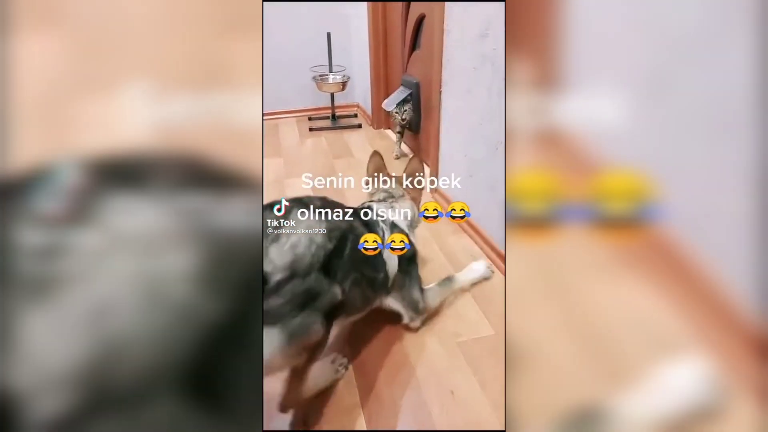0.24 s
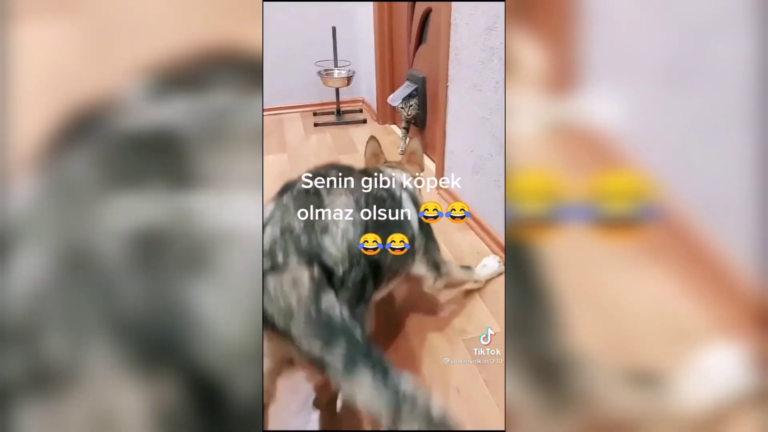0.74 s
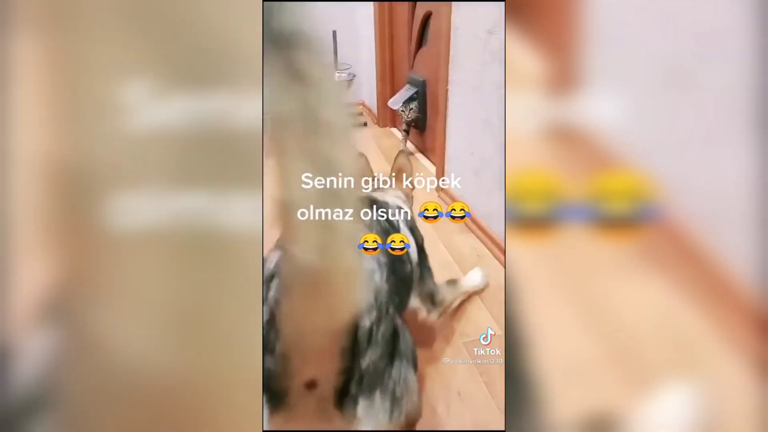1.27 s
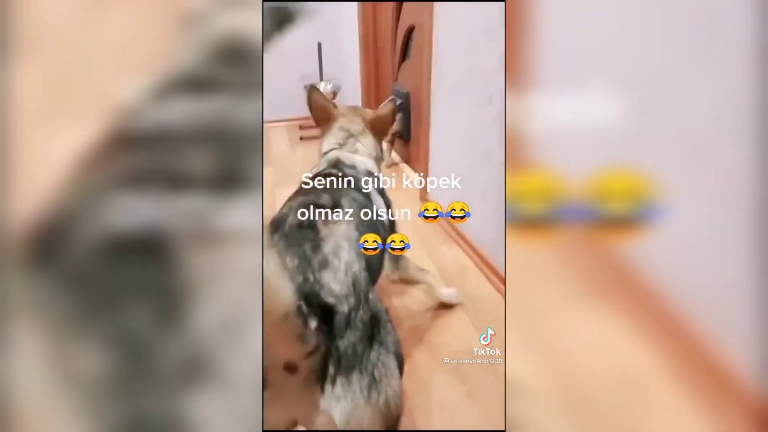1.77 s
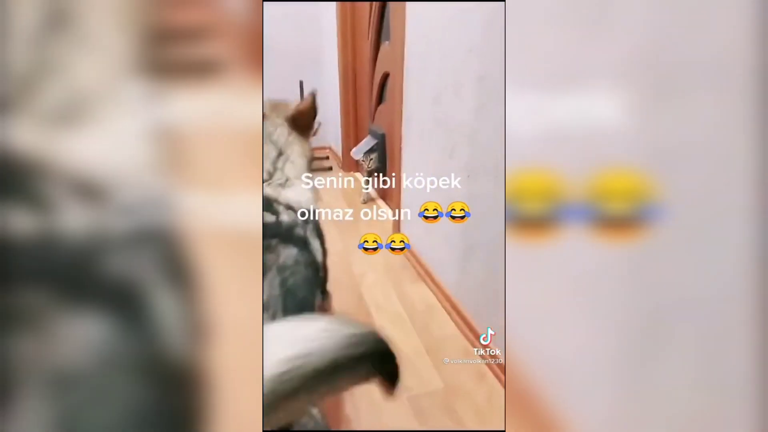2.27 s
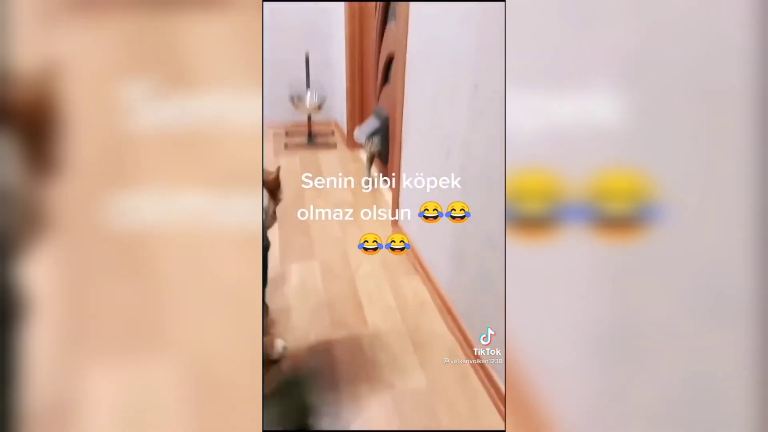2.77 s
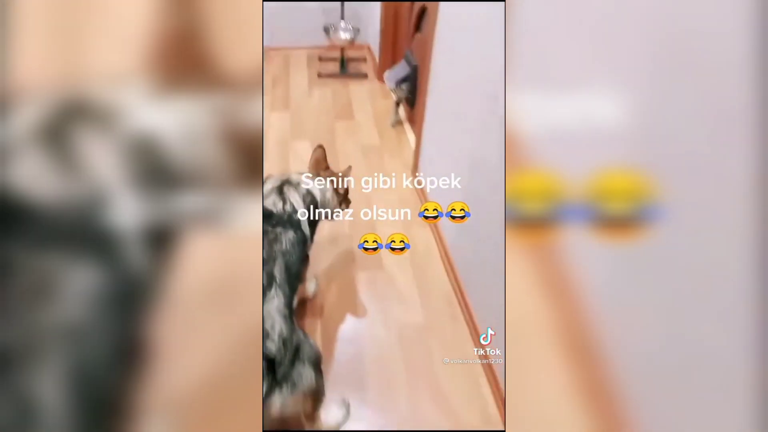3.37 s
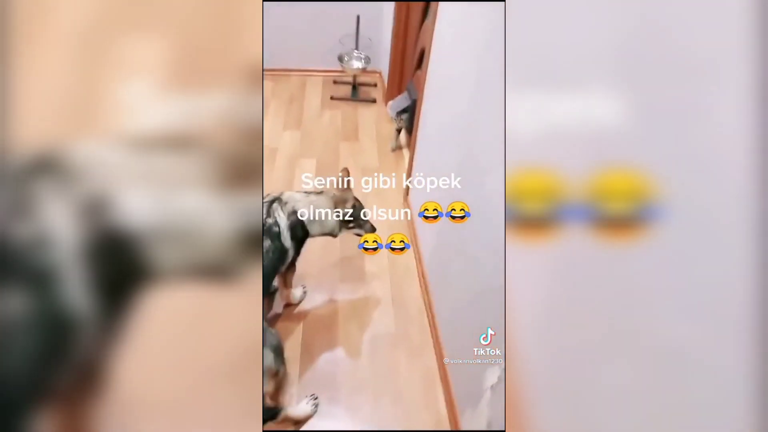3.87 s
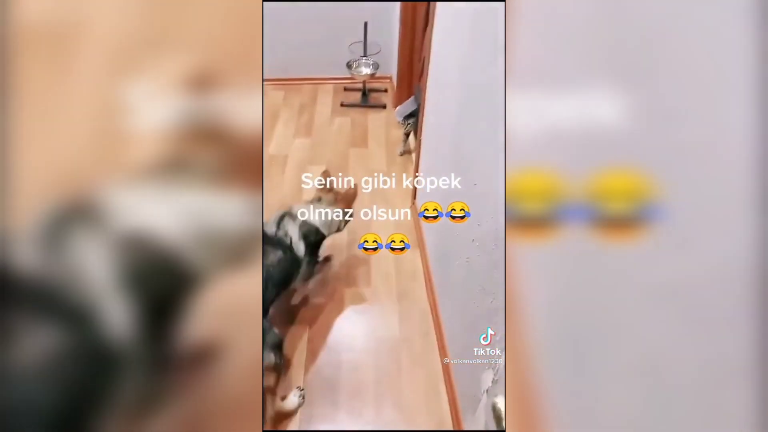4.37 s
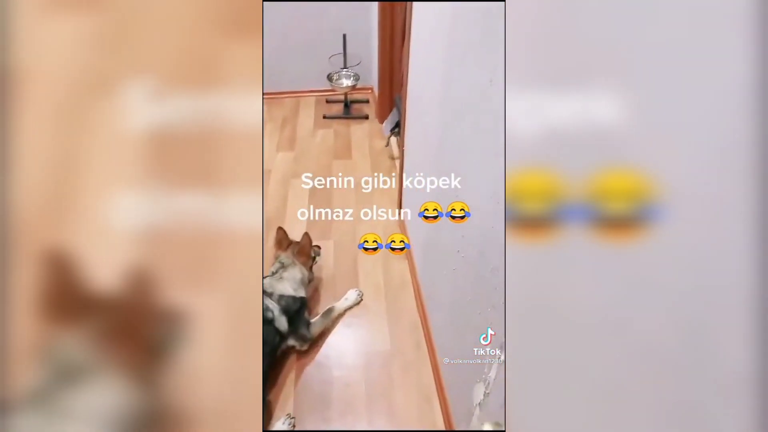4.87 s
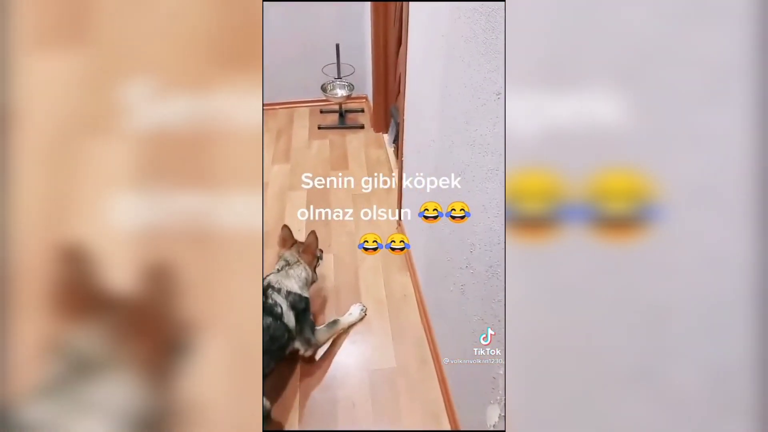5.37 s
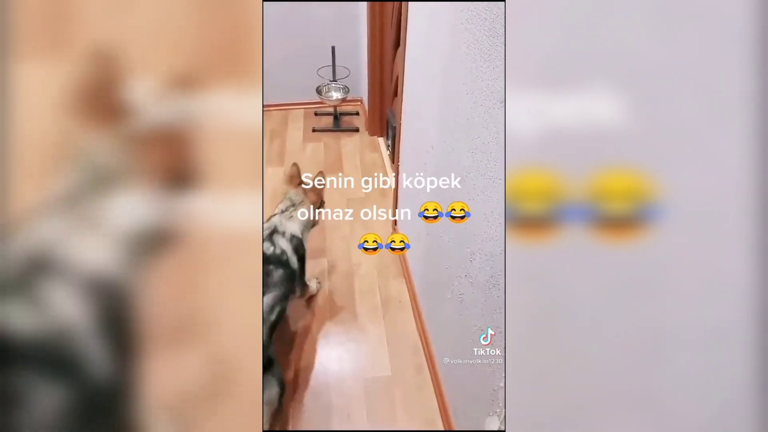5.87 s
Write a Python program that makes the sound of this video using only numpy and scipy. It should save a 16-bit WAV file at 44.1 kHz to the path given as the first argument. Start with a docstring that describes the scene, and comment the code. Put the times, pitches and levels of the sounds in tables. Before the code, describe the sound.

A dog barks, growls up into rasping yelps and a yowl, holds a long thin whine, then barks again and snorts indoors.

```python
"""A dog complains in a small room with a wooden floor and bare walls.
It barks and huffs, moans and growls its way up to rasping yelps and a yowl, holds a long thin whine,
barks again, grumbles, then sniffs and snorts. The calls are vocal fold pulses coloured by the throat,
the whine a note through the nose, the sniffs turbulent air. Throughout, its body bumps and brushes
the floor as it gets up and moves about."""
import sys
import numpy as np
from scipy import signal
from scipy.fft import rfft, irfft, next_fast_len
from scipy.io import wavfile
from scipy.ndimage import uniform_filter1d

SR = 44100
rng = np.random.default_rng(int(sys.argv[2]) if len(sys.argv) > 2 else 0)


def store_wav(level_fs):
    """Save 16-bit WAV to argv[1]."""
    pcm = np.round(np.clip(np.atleast_2d(level_fs), -1, 1) * 32767)
    wavfile.write(sys.argv[1], SR, pcm.T.astype(np.int16))


N = 270774

# room noise spectrum: f/Hz, level/dB
HUSH_SPECTRUM = [(30, -9.5), (130, -8.5), (400, -30), (1500, -26), (3300, -27), (6700, -17.5),
                 (15500, -33.5)]
# room decay: f/Hz, T60/s
ROOM_DECAY = [(90, 0.47), (250, 0.24), (600, 0.3), (2000, 0.33), (6000, 0.25), (14000, 0.23)]
# early echoes: delay/s, relative gain
WALL_ECHOES = [(.0031, -0.64), (.0058, -0.37), (.0094, .27), (0.0134, .22), (0.0175, -0.52)]
# floor modes: f/Hz, level/dB, T60/s
FLOOR_MODES = [(89.3, 4.5, 0.62), (111.3, 9, 0.29), (124.3, -5, 0.32), (160, -12, 0.98), (198, -44.5, .12)]
# body and paws on the floor: t/s, level/dB
BUMPS = [(0.086, -31.5), (0.126, -32.5), (0.803, -34), (1.224, -38.5), (2.41, -54.5), (3.477, -59.5),
         (3.64, -56), (4.23, -45.5), (5.764, -56), (5.858, -49.5), (5.921, -57.5)]
# coat and claws on the floor: t/s, level/dB, decay/s
SCUFFS = [(0.797, -50.5, 0.03), (0.912, -51.5, 0.034), (3.47, -49.5, 0.14), (3.825, -43, 0.018),
          (5.852, -59, 0.11), (5.931, -69.5, 0.094)]
# air through the nose: start/s, attack/s, hold/s, release/s, level/dB
SNIFFS = [(0.021, 0.023, 0.31, 0.61, -43.5), (0.548, 0.11, .008, 0.4, -47), (0.931, .02, 0.018, 0.63, -56),
          (1.095, .13, 0.017, 0.25, -43), (4.683, 0.18, 0.33, 0.32, -40), (5.442, 0.054, 0.024, 0.2, -55)]
# envelopes: t/s, level/dB
HUFF_LEVEL = [(.24, -49.5), (.33, -52), (.45, -48.5), (.53, -54.5), (.7, -59)]
SNORT_LEVEL = [(5.55, -59), (5.58, -42), (5.59, -39), (5.596, -21.5), (5.617, -23.5), (5.632, -38),
               (5.66, -41.5), (5.72, -62)]
MOAN_LEVEL = [(.95, -61), (.98, -49.5), (1.12, -41), (1.22, -45.5), (1.42, -48), (1.56, -52)]
# noise spectra: f/Hz, level/dB
SCUFF_SPECTRUM = [(300, 0), (1000, 0), (1700, 1), (3500, -5), (6500, -1), (10000, -9), (15000, -14)]
HUFF_SPECTRUM = [(100, 2), (250, -8.5), (420, 2.5), (600, -9), (920, 4), (1300, -25), (3000, -32)]
SNIFF_SPECTRUM = [(110, -19), (180, -10), (282, 5), (440, -5), (511, -13.5), (628, 4), (729, -8.5),
                  (928, 0), (1230, -1), (1720, 1.5), (1920, -0.5), (2540, -1), (3000, -4), (6330, -6.5),
                  (15500, -20.5)]
SNORT_SPECTRUM = [(59, -45), (100, -9), (190, -1), (258, -0.5), (400, -5.5), (541, -10.5), (614, -6),
                  (843, -10.5), (956, -3.5), (1180, -8), (1370, -5), (1690, -12.5), (2130, -7.5),
                  (2370, -12), (2580, -10.5), (6120, -13.5), (15500, -33.5)]
# throat response per call: f/Hz, gain/dB
GRUMBLE_THROAT = [(40, -17), (85, -7), (125, -4.5), (180, -1), (310, 1.5), (400, -17), (600, -16),
                  (1100, -28.5), (2200, -32.5), (4000, -37.5), (12000, -53.5)]
GROWL_THROAT = [(50, -25), (115, -1), (240, 7.5), (350, -9), (470, -20), (680, -9.5), (950, -39),
                (1500, -46.5), (6000, -69.5)]
MOAN_THROAT = [(100, 16), (190, 9.5), (290, 4), (400, 5), (560, -3.5), (820, -1.5), (1200, -18.5),
               (1500, -53.5), (2700, -19.5), (3600, -43.5), (9000, -46)]
WHINE_THROAT = [(400, 0.5), (570, -17), (1140, -15.5), (1730, -1), (2300, -17.5), (2880, -9.5), (3450, -16),
                (4050, -19.5), (4600, -18.5), (5200, -9.5), (5800, -18), (6400, -24.5), (7000, -35),
                (8000, -35.5), (14000, -46.5)]
YELP_THROAT = [(150, 9.5), (500, 7.5), (850, -3.5), (1200, -0.5), (1500, -11.5), (1900, -10.5),
               (2400, -20.5), (3100, -29.5), (3750, -33.5), (4300, -42.5), (5000, -31), (5800, -17.5),
               (7100, -21.5), (8800, -38), (11500, -44), (15000, -55.5)]
BARK_THROAT = [(200, 4.5), (400, 0.5), (630, -6), (850, -12), (1220, -1), (1600, -11.5), (2050, -6),
               (2600, -11), (3500, -27.5), (4700, -32), (6300, -11.5), (8500, -19.5), (15000, -43.5)]
# grumbles: start/s, attack/s, hold/s, release/s, first f/Hz, last f/Hz, roughness/0-1, level/dB
GRUMBLES = [(0, 0.0028, .025, 0.11, 106, 95, 0.79, -31), (2.832, 0.066, 0.019, .12, 175, 158, 0.21, -30),
            (4.288, .08, 0.014, 0.038, 123.3, 137.8, 0.4, -28.5),
            (4.455, 0.046, 0.2, .19, 71.6, 55.8, 0.62, -23.5)]
# growl: t/s, f/Hz, roughness/0-1, level/dB
GROWL = [(1.2, 105.7, 0.2, -43), (1.235, 104.5, 0.4, -41.5), (1.31, 122.7, 0.28, -32.5),
         (1.38, 113.6, 0.02, -30.5), (1.44, 111.7, .14, -30), (1.515, 131.7, 0.3, -25),
         (1.57, 126.7, 0.38, -28.5), (1.6, 114.4, 0.5, -47.5)]
# pitch curves: t/s, f/Hz
WHINE_PITCH = [(2.45, 506.5), (2.9, 492.5), (3.0, 516.9), (3.014, 510), (3.156, 533), (3.362, 574),
               (3.552, 587), (3.82, 581.5), (4.198, 564.5), (4.37, 571.5)]
YOWL_PITCH = [(2.05, 385), (2.09, 421), (2.18, 413), (2.26, 436), (2.365, 495), (2.395, 622), (2.42, 607),
              (2.455, 560), (2.64, 553)]
# whine levels: t/s, second partial/dB, third partial/dB, treble/dB
WHINE_LEVELS = [(2.45, -69.5, -79, -64), (2.58, -37, -57, -46.5), (2.8, -52, -57, -49),
                (3.0, -41, -42, -47), (3.212, -47, -38.5, -45), (3.308, -39.5, -47, -44),
                (3.43, -59, -33, -42.5), (3.576, -42.5, -36.5, -44.5), (3.67, -53.5, -42, -41.5),
                (3.796, -40, -54, -46), (3.834, -43.5, -40, -41.5), (3.888, -56, -39, -46),
                (4.01, -39.5, -47.5, -45), (4.37, -41.5, -28, -39), (4.395, -48, -27, -51)]
# yowl rattle: t/s, roughness/0-1
YOWL_ROUGHNESS = [(2.05, 0.52), (2.1, 0.013), (2.32, 0.041), (2.375, 0.2), (2.45, .025)]
# yowl bands: t/s, low/dB, mid/dB, high/dB
YOWL_LEVELS = [(2.05, -22.5, -31.5, -46), (2.094, -24.5, -31, -38.5), (2.128, -26.5, -29, -43.5),
               (2.194, -30, -22.5, -38.5), (2.228, -22, -34, -46), (2.29, -17.5, -36, -41.5),
               (2.376, -32.5, -30.5, -46.5), (2.398, -19, -29, -50.5), (2.506, -22, -31.5, -42),
               (2.64, -42, -39, -62.5)]
# voice breaks between cries: start/s, hold/s, low/dB, mid/dB, high/dB
RASPS = [(1.572, 0.0052, -35.5, -25, -40), (1.71, 0.077, -27, -29.5, -41), (1.935, 0.091, -29, -32, -46.5),
         (2.839, 0.017, -31.5, -35.5, -49)]
# cries, one pitch arch each: start/s, hold/s, release/s, crest/s, half width/s, top flatness,
# top f/Hz, roughness/0-1, low/dB, mid/dB, high/dB, mouth resonance/Hz
YELPS = [(1.589, .1, .08, 1.667, .062, 4.5, 518.4, 0.07, -15.5, -26.5, -41, 2100),
         (1.812, 0.085, 0.2, 1.888, 0.048, 2.06, 592, .17, -18, -20.5, -37.5, 1745),
         (2.634, 0.15, 0.12, 2.718, 0.06, 2.6, 781.4, 0.07, -18, -24, -32, 1740)]
BARKS = [(-.04, 0.018, 0.108, .015, .055, 2.5, 667, 0.403, -24, -23.5, -48.5, 2065),
         (4.378, 0.037, 0.23, 4.52, .118, 8, 629.9, 0.18, -16, -20, -40, 2250)]

BAND_LIMIT_HZ = 15600
YELP_ATTACK_S, BARK_ATTACK_S = 0.029, 0.041


def amp(db):
    """Decibels to gain."""
    return 10 ** (np.asarray(db) / 20)


def unit(x):
    """Scale to rms 1."""
    return x / np.sqrt(np.mean(x ** 2) + 1e-20)


def steady(x):
    """Hold the running rms at 1."""
    power = uniform_filter1d(uniform_filter1d(x ** 2, size=1100), size=700)
    return x / np.sqrt(abs(power) + 1e-14)


def at_hz(table, hz):
    """Table value on a log-frequency axis."""
    f, value = np.transpose(table)
    return np.interp(np.log(hz + 1), np.log(f + 1), value)


def at_times(table, t):
    """Table columns at times t."""
    times, *columns = np.transpose(table)
    return [np.interp(t, times, column) for column in columns]


def curve(table):
    """Sample times spanning a table, then its columns."""
    t = np.arange(max(table[0][0], 0), table[-1][0], 1 / SR)
    return t, *at_times(table, t)


def envelope(start_s, attack_s, hold_s, release_s):
    """Sample times and level/dB: rise, hold, decay."""
    knees_s = start_s + np.cumsum([0, attack_s, hold_s, release_s])
    t = np.arange(max(start_s, 0), knees_s[-1], 1 / SR)
    return t, np.interp(t, knees_s, [-20, 0, 0, -36.5])


def shape(x, gain):
    """Filter by gain(f)."""
    size = next_fast_len(len(x) + 4096)
    return irfft(rfft(x, size) * gain(np.fft.rfftfreq(size, 1 / SR)), size)[:len(x)]


def colour(x, spectrum):
    """Filter by a spectrum table."""
    return shape(x, lambda f: amp(at_hz(spectrum, f)))


def resonate(x, hz, width_hz):
    """Unity-gain resonance, fixed or moving."""
    carrier = np.exp(2j * np.pi * np.cumsum(np.broadcast_to(hz, len(x))) / SR)
    pole = np.exp(-np.pi * width_hz / SR)
    return 2 * (carrier * signal.lfilter([1 - pole], [1, -pole], x / carrier)).real


def wobble(t, hz):
    """Random motion up to about hz, rms 1."""
    return unit(shape(rng.standard_normal(len(t)), lambda f: 1 / (1 + (f / hz) ** 2)))


def add(mix, t, sound):
    """Mix in at times t, 6 ms fades."""
    fade = np.clip(np.minimum(t - t[0], t[-1] - t) / .006, 0, 1)
    part = mix[round(t[0] * SR):][:len(t)]
    part += (sound * fade)[:len(part)]


def hush(level_db):
    """Steady noise of the quiet room."""
    return amp(level_db) * unit(colour(rng.standard_normal(N), HUSH_SPECTRUM))


def room(x, wet_db, echo_gain, treble_db=5):
    """Wall echoes, then a dense tail; treble is beamed at the walls, so it arrives wetter."""
    size = 32768
    taps = rng.standard_normal(size) * (rng.random(size) < .1) * (np.arange(size) > .008 * SR)
    hz, t, z = signal.stft(taps, SR, nperseg=256)
    decay = amp(-60 * t / at_hz(ROOM_DECAY, hz)[:, None])
    tail = signal.istft(z * decay, SR, nperseg=256)[1]
    direct = np.zeros(size)
    direct[0] = 1
    for delay_s, gain in WALL_ECHOES:
        direct[round(delay_s * SR)] += echo_gain * gain
    early, late = (signal.fftconvolve(x, ir / np.linalg.norm(ir))[:N] for ir in (direct, tail))
    wet = lambda f: amp(wet_db + treble_db * f ** 2 / (f ** 2 + 2500 ** 2))
    early = shape(early, lambda f: 1 / np.hypot(1, wet(f)))
    return early + shape(late, lambda f: wet(f) / np.hypot(1, wet(f)))


def bump(start_s, level_db, rise_s=.01):
    """A soft blow rings the low floor modes."""
    t = np.arange(0, .5, 1 / SR)
    ring = sum(amp(db - 60 * t / t60_s) * np.sin(2 * np.pi * hz * t) for hz, db, t60_s in FLOOR_MODES)
    return start_s + t, amp(level_db) * ring * (1 - np.exp(-(t / rise_s) ** 2))


def scuff(start_s, level_db, decay_s, grain_db=4):
    """A short grainy brush over the boards."""
    t = np.arange(0, 2 * decay_s, 1 / SR)
    grains = rng.standard_normal(len(t)) * amp(grain_db * wobble(t, 270))
    gain = amp(level_db) * np.exp(-t / decay_s) * np.minimum(t / 0.006, 1)
    return start_s + t, gain * unit(colour(grains, SCUFF_SPECTRUM))


def breath(t, level_db, spectrum, gain_db, flutter_hz, flutter_db=1):
    """Turbulent air through fluttering nostrils."""
    air = rng.standard_normal(len(t)) * amp(flutter_db * wobble(t, flutter_hz))
    return t, amp(level_db + gain_db) * unit(colour(air, spectrum))


def head_turns(x, depth_db, full_depth_hz=3500):
    """Overtones fade and swell as the head turns, high ones most."""
    f, _, z = signal.stft(x, SR, nperseg=512, noverlap=384)
    patches = uniform_filter1d(rng.standard_normal(z.shape), size=4, axis=0)
    patches = unit(uniform_filter1d(patches, size=24, axis=1))
    swing_db = depth_db * np.minimum(f / full_depth_hz, 1)[:, None]
    return signal.istft(z * amp(swing_db * (patches - .5)), SR, nperseg=512, noverlap=384)[1][:N]


def above_pitch(x, hz):
    """Steep low cut tracking just under the fundamental."""
    f, frames_s, z = signal.stft(x, SR, nperseg=1024, noverlap=768)
    corner_hz = 0.75 * np.interp(frames_s * SR, np.arange(len(x)), hz)
    gain = amp(-18.5) + 1 - 1 / (1 + (f[:, None] / corner_hz) ** 8)
    return signal.istft(z * gain, SR, nperseg=1024, noverlap=768)[1][:len(x)]


def folds(t, hz, rough, jitter=.08, shimmer=0.55):
    """Vocal fold pulses; when rough they jitter, alternate strong and weak, and leak air."""
    cycles = np.cumsum(hz * (1 + (0.0023 + jitter * rough) * wobble(t, 110))) / SR
    half_phase = np.pi * (cycles % 1 - .5) + 1e-9
    harmonics = np.floor(BAND_LIMIT_HZ / hz)
    pulses = np.sin((2 * harmonics + 1) * half_phase) / np.sin(half_phase) - 1  # flat spectrum
    pulses /= np.sqrt(2 * harmonics)
    pulses *= 1 + shimmer * rough * (wobble(t, 120) + np.sin(np.pi * cycles))
    puffs = unit((0.78 + np.cos(half_phase) ** 4) * rng.standard_normal(len(t)))
    return above_pitch((1 - rough) * pulses + (0.0062 + 0.78 * rough) * puffs, hz)


def shut_call(t, hz, rough, level_db, throat, jitter):
    """Lips closed: folds through one fixed throat response."""
    return t, amp(level_db) * steady(colour(folds(t, hz, rough, jitter), throat))


def grumble(start_s, attack_s, hold_s, release_s, first_hz, last_hz, rough, peak_db, gain_db=-1):
    """A short, very uneven growl with sliding pitch."""
    t, level_db = envelope(start_s, attack_s, hold_s, release_s)
    hz = np.linspace(first_hz, last_hz, len(t))
    return shut_call(t, hz, rough, level_db + peak_db + gain_db, GRUMBLE_THROAT, jitter=.3)


def growl(gain_db=0.5):
    """Low rough pulses swelling under the moan."""
    t, hz, rough, level_db = curve(GROWL)
    return shut_call(t, hz, rough, level_db + gain_db, GROWL_THROAT, jitter=.16)


def moan(low_hz=155, high_hz=625, midpoint_s=1.285, glide_s=.071, rough=.07, gain_db=2.5):
    """Mouth shut, pitch climbing two octaves along an S."""
    t, level_db = curve(MOAN_LEVEL)
    hz = low_hz + (high_hz - low_hz) / (1 + np.exp((midpoint_s - t) / glide_s))
    return shut_call(t, hz, rough, level_db + gain_db, MOAN_THROAT, jitter=0.081)


def whine(gain_db=1, waver=0.0021, flutter=0.0065, air_db=-19, flicker_db=2):
    """Thin nasal note: strong partials 2 and 3, weak fundamental, flickering overtones."""
    t, second_db, third_db, treble_db = curve(WHINE_LEVELS)
    hz = at_times(WHINE_PITCH, t)[0] * (1 + waver * wobble(t, 24) + flutter * wobble(t, 150))
    phase = 2 * np.pi * np.cumsum(hz) / SR
    core = amp(second_db) * unit(np.cos(2 * phase)) + amp(third_db) * unit(np.cos(3 * phase))
    partials = unit(sum(amp(flicker_db * wobble(t, 6.3)) * np.cos(k * phase)
                        for k in [1, *range(4, 25)]))
    hiss = np.diff(rng.standard_normal(len(t) + 1))
    air = amp(air_db) * hiss * (1 + np.cos(phase))
    treble = amp(treble_db) * steady(colour(partials + air, WHINE_THROAT))
    return t, amp(gain_db) * (core + treble)


def open_call(t, hz, rough, low_db, mid_db, high_db, throat, mouth_hz, mouth_db):
    """Mouth open: low throat tone, mid band with mouth resonance, high band with muzzle resonance."""
    voice = colour(folds(t, hz, rough), throat)
    low = shape(voice, lambda f: 1 / (1 + (f / 900) ** 12))
    high = shape(voice, lambda f: 1 - 1 / (1 + (f / 4300) ** 16))
    mid = voice - low - high
    mid += amp(mouth_db) * resonate(mid, mouth_hz, width_hz=170)
    muzzle_hz = 6500 * (1 + 0.046 * wobble(t, 27))
    high += amp(8) * resonate(high, muzzle_hz, width_hz=350)
    return t, amp(low_db) * steady(low) + amp(mid_db) * steady(mid) + amp(high_db) * steady(high)


def rasp(start_s, hold_s, low_db, mid_db, high_db, hz=259.9, rough=0.65):
    """Slack folds rattle at low pitch, mouth still open."""
    t, level_db = envelope(start_s, YELP_ATTACK_S, hold_s, release_s=0.051)
    return open_call(t, np.full(len(t), hz), rough, level_db + low_db, level_db + mid_db,
                     level_db + high_db, YELP_THROAT, mouth_hz=1900, mouth_db=8.5)


def yowl():
    """A clear held note, rough at the onset and where it cracks upward."""
    t, low_db, mid_db, high_db = curve(YOWL_LEVELS)
    hz, rough = at_times(YOWL_PITCH, t)[0], at_times(YOWL_ROUGHNESS, t)[0]
    return open_call(t, hz, rough, low_db - 0.5, mid_db + 1, high_db + 0.5,
                     YELP_THROAT, mouth_hz=1650, mouth_db=18.5)


def cry(row, attack_s, throat, mid_db_per_oct, high_db_per_oct, mouth_db, slack_hz=434.8, throat_hz=485):
    """Bark or yelp: one pitch arch; off the crest the folds slacken, lower and rougher."""
    start_s, hold_s, release_s, crest_s, half_width_s, flatness, top_hz, rough = row[:8]
    low_db, mid_db, high_db, mouth_hz = row[8:]
    t, level_db = envelope(start_s, attack_s, hold_s, release_s)
    slack = 1 - np.exp(-abs((t - crest_s) / half_width_s) ** flatness)
    hz = top_hz + (slack_hz - top_hz) * slack
    octaves = np.log2(hz / top_hz)
    low_db += level_db - 12.5 * abs(np.log2(hz / throat_hz))  # strongest at the throat resonance
    mid_db += level_db + mid_db_per_oct * octaves
    high_db += level_db + high_db_per_oct * octaves
    return open_call(t, hz, rough + 0.15 * slack, low_db, mid_db, high_db, throat, mouth_hz, mouth_db)


def scene():
    """The dog at two spots, each with its own echoes, over floor bumps and room noise."""
    near, far, floor = np.zeros((3, N))
    for row in BARKS:
        add(near, *cry(row, BARK_ATTACK_S, BARK_THROAT,
                       mid_db_per_oct=-18.5, high_db_per_oct=-29, mouth_db=2.5))
    for row in YELPS:
        add(near, *cry(row, YELP_ATTACK_S, YELP_THROAT,
                       mid_db_per_oct=10, high_db_per_oct=19.5, mouth_db=14.5))
    for row in RASPS:
        add(near, *rasp(*row))
    add(near, *yowl())
    add(near, *moan())
    add(near, *growl())
    add(far, *whine())
    for row in GRUMBLES:
        add(far, *grumble(*row))
    add(near, *breath(*curve(HUFF_LEVEL), HUFF_SPECTRUM, gain_db=1, flutter_hz=47.4, flutter_db=4))
    for *timing_s, peak_db in SNIFFS:
        t, level_db = envelope(*timing_s)
        add(near, *breath(t, level_db + peak_db, SNIFF_SPECTRUM, gain_db=-4, flutter_hz=40.45))
    add(near, *breath(*curve(SNORT_LEVEL), SNORT_SPECTRUM, gain_db=-2.5, flutter_hz=151.6))
    for row in SCUFFS:
        add(near, *scuff(*row))
    for row in BUMPS:
        add(floor, *bump(*row))
    near, far = head_turns(near, depth_db=3.5), head_turns(far, depth_db=4)
    room_mode = amp(-3) * resonate(near, hz=636.6, width_hz=4.3)
    background = hush(level_db=-71.5) + floor
    dog = room(near, wet_db=-6, echo_gain=0.33) + room(far, wet_db=-2.5, echo_gain=0.12)
    return (background + room_mode + dog)[None]


def record(dry):
    """Low-pass at the band limit."""
    lowpass = signal.firwin(511, BAND_LIMIT_HZ, window=("kaiser", 9), fs=SR)
    return signal.oaconvolve(dry, lowpass[None], "same")


dry = scene()
out = record(dry)
store_wav(out)
```